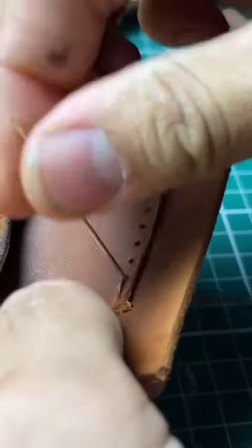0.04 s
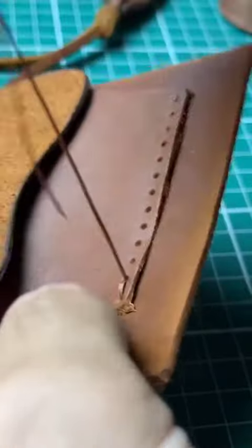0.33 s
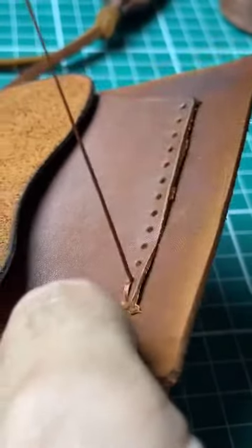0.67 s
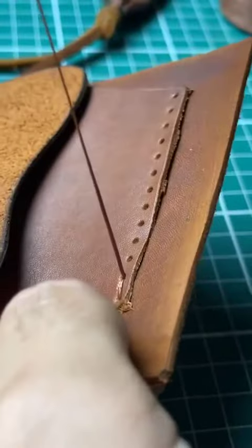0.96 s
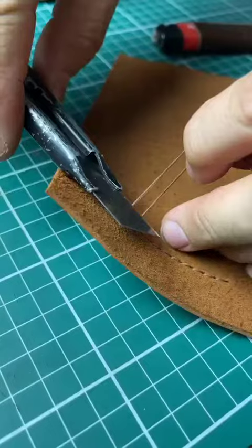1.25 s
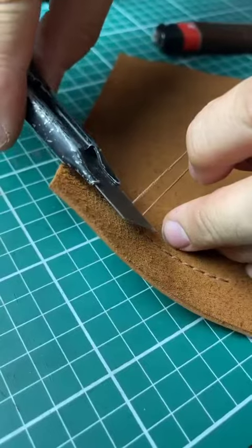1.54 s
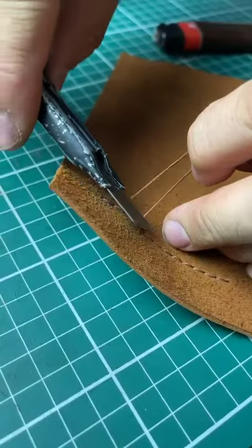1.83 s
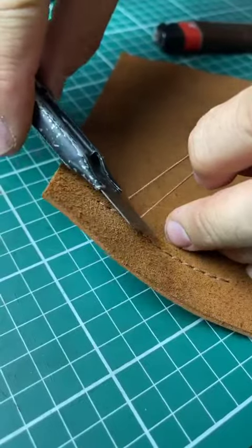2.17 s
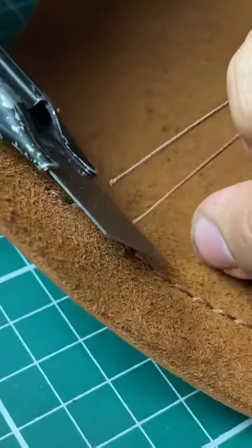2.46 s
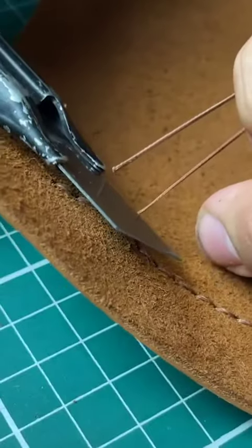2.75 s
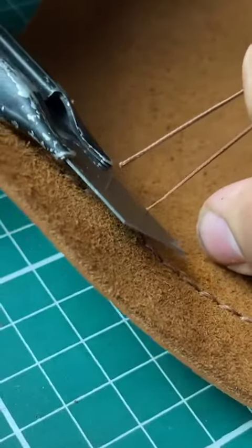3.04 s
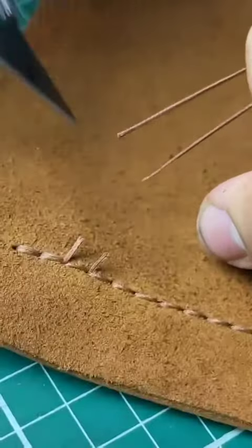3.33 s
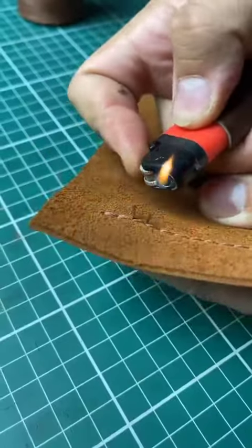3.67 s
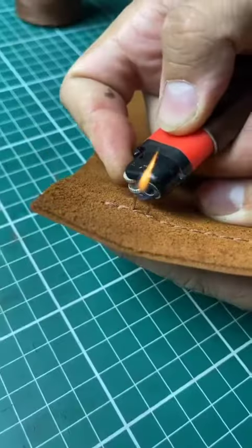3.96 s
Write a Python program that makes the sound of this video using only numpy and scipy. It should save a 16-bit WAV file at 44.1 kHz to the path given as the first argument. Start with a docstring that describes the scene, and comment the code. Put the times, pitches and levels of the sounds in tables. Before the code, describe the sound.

A blade scrapes and ticks through thread on leather, close to the microphone in a quiet room. Thread is first tugged through a hole; short cutting strokes follow and end in a sharp snap, then a lighter rasps and catches.

```python
"""Leatherwork close to the microphone in a quiet room, with soft bumps of hands on leather.
First a thread is tugged free and hisses through a stitch hole. Next a blade saws at the thread ends
in short strokes: fibres tick and sizzle, the blade clinks in its holder, and the thread snaps.
Last, a lighter's flint wheel rasps and the gas catches with a soft pop."""
import sys
import numpy as np
from scipy import signal
from scipy.fft import rfft, irfft, next_fast_len
from scipy.io import wavfile
from scipy.ndimage import map_coordinates

SR = 44100
rng = np.random.default_rng(int(sys.argv[2]) if len(sys.argv) > 2 else 0)


def log_audio(samples):
    """Write samples as a 16-bit WAV file to the path given in sys.argv[1]."""
    # one column per channel
    frames = np.atleast_2d(samples).T
    # limit to full scale, then quantise
    limited = np.clip(frames, -1, 1)
    pcm = np.round(limited * 32767).astype(np.int16)
    wavfile.write(sys.argv[1], SR, pcm)


N = 176400  # 4 seconds

# A "colour" says how strong each frequency is. A "tilt" brightens it, in dB per octave.
# A "t60" is the time in seconds that a sound takes to fade by 60 dB.
# The colour of a tiny tick of fibre or steel. Each row: frequency in Hz, level in dB.
TICK_COLOUR = [(200,-12),(1300,-15),(2600,-4),(4400,-4.5),(5500,-0.5),(6400,-7.5),(8500,-4.5),(11000,-18.5),(15000,-33.5)]


def leather_rubs():
    """The thread rasps brightly as the pull begins; later, blade and fingers rub the leather."""
    # Each row: start in seconds, length in seconds, level in dB, tilt in dB per octave.
    rubs = [(0.418,0.033,-59.5,7),(1.41,0.097,-73,0),(1.628,0.06,-63,-2),(1.753,0.019,-59.5,-5),(1.839,0.057,-59,-1),(1.928,0.02,-52.5,-1.5),(1.951,0.04,-65,0.5),
            (2.029,0.082,-62,1.7),(2.141,0.091,-64.5,-1),(2.26,0.067,-64.5,0.5),(2.354,0.049,-69.5,-2),(2.447,0.079,-66.5,0),(2.566,0.048,-64,-4.5),
            (2.753,0.068,-65,-2.5),(2.866,0.049,-63.5,1.5),(3.033,0.073,-66,-2.5),(3.164,0.044,-54.5,-3.5),(3.257,0.058,-68,2)]
    # The colour of scraped leather. Each row: frequency in Hz, level in dB.
    scrape_colour = [(150,-10),(550,-6),(900,1.5),(1700,-0.5),(2200,-2),(2950,0),(4000,-4),(7500,-10),(9800,-5),(15000,-19.5)]
    out = np.zeros((2, N))
    for start, length, db, tilt_db in rubs:
        at, press = swell(start, length, rise_s=0.0045, fall_s=0.0086)
        rub = friction(len(press), scrape_colour, tilt_db, grain_db=2, grain_hz=498)
        rub = unit(filtered(rub, lambda hz: amp(contact_ripple(hz))))
        add(out, at, amp(db) * press * rub)
    return out


def fraying_fibres():
    """Fibres sizzle where the edge bites: narrow noise whose pitch wanders as they stretch and part."""
    # Each row: start in seconds, length in seconds, level in dB.
    frays = [(1.337,0.027,-74.5),(1.534,0.048,-72),(1.657,0.029,-65.5),(1.7,0.03,-69),(1.89,0.015,-58),(2.669,0.034,-62),(2.873,0.034,-60),(3.054,0.042,-59.5),(3.215,0.031,-65)]
    centre_hz, width_hz, wander_hz = 8150, 1050, 608
    lowpass = lambda hz: 1 / np.hypot(1, hz / width_hz) / np.hypot(1, 2 * hz / centre_hz)
    out = np.zeros((2, N))
    for start, length, db in frays:
        at, bite = swell(start, length, rise_s=0.0016, fall_s=0.0032)
        n = len(bite)
        pitch_hz = centre_hz + wander_hz * wander(n, rate_hz=160)
        phase = 2 * np.pi * np.cumsum(pitch_hz) / SR
        low_noise = filtered(rng.standard_normal((2, 2, N))[..., :n], lowpass)
        sizzle = low_noise[0] * np.cos(phase) + low_noise[1] * np.sin(phase)  # moved up to the pitch
        add(out, at, amp(db) * bite * unit(spread(sizzle)))
    return out


def fibre_ticks():
    """Single fibres tick as they part."""
    # Each row: start in seconds, level in dB, tilt in dB per octave.
    ticks = [(1.3728,-40.5,-3.5),(1.411,-39,-4),(1.4626,-41,-1.5),(1.476,-37.5,-5.5),(1.5025,-39.5,-6.5),(1.5427,-44,1),(1.6572,-40,3),
             (1.6785,-35,4),(1.7068,-33,0),(1.8409,-29,5),(1.9007,-30,-2),(2.2938,-32.5,-4.5),(2.5065,-33,-1.5),(2.6672,-29,1.5),(2.6865,-31,0),
             (2.8734,-23,4.5),(2.881,-34,1),(2.8903,-27,3.5),(2.9054,-26.5,2.5),(3.057,-19.5,6),(3.067,-32,3),(3.0742,-27.5,2.5),(3.082,-33,1),
             (3.091,-28.5,-1),(3.1141,-32.5,-1),(3.213,-26.5,-0.5),(3.2536,-31,2),(3.2854,-32,1),(3.3985,-41.5,-5.5)]
    out = np.zeros((2, N))
    for start, db, tilt_db in ticks:
        add(out, start, amp(db) * crack(TICK_COLOUR, tilt_db, t60=0.0097, crumble=6.4))
    return out


def snaps():
    """Thread, flint and igniting gas let go with sharp snaps."""
    # Each row: start in seconds, level in dB, tilt in dB per octave, t60 in seconds.
    releases = [(0.36,-39.5,-1,0.034),(0.3931,-23.5,2.5,0.026),(.397,-17.5,-5.5,0.02),(1.8927,-19,2.5,0.015),(1.943,-22.5,1.8,.018),
                (3.195,-17,1.5,0.008),(3.1972,-5,-1,0.0074),(3.641,-9.5,-4.5,.012),(3.644,-9,0,.014),(3.648,-12.5,7,0.013),(3.699,-21,-4.5,.02),(3.706,-20.5,-1,.015),(3.722,-17.5,-9,.012)]
    # The colour of a snap. Each row: frequency in Hz, level in dB.
    snap_colour = [(100,-3.5),(230,-1.5),(420,-11),(780,2.5),(1250,-1),(1600,0),(2050,-7.5),(2900,-6.5),(4300,-14),(8500,-15.5),(15000,-27.5)]
    out = np.zeros((2, N))
    for start, db, tilt_db, t60 in releases:
        add(out, start, amp(db) * crack(snap_colour, tilt_db, t60, crumble=1.07))
    return out


def blade_clink():
    """The steel blade shifts in its holder, rings briefly and chatters once."""
    # The blade's ringing tones. Each row: frequency in Hz, level in dB, t60 in seconds.
    tones = [(2833,1,0.023),(4820,-5.5,0.022),(5330,-8,0.025),(8700,-21,0.022)]
    clink_s, clink_db, chatter_delay_s, chatter_drop_db = 1.9813, -33.5, 0.0071, 16
    out, t = np.zeros((2, N)), np.arange(SR // 8) / SR
    attack = 1 - np.exp(-t / 0.00018)
    for start, db in [(clink_s, clink_db), (clink_s + chatter_delay_s, clink_db - chatter_drop_db)]:
        ring = sum(amp(tone_db) * fade(t, t60) * np.sin(2 * np.pi * (hz * t + rng.random()))
                   for hz, tone_db, t60 in tones)
        add(out, start, amp(db) * ring * attack)
        add(out, start, amp(db + 3) * crack(TICK_COLOUR, tilt_db=2, t60=0.026, crumble=3.2))
    return out


def thread_pull():
    """Thread hisses through the stitch hole, fading as the arm extends and slows."""
    # The loudness of the pull. Each row: time in seconds, level in dB.
    pull = [(.38,-100),(.393,-50),(.415,-57.5),(.44,-54),(.51,-66.5),(.72,-68),(.82,-72.5),(1.02,-98)]
    # The colour of the hiss. Each row: frequency in Hz, level in dB.
    pull_colour = [(150,-25),(250,-4.5),(500,-22),(750,-11.5),(950,-16),(1350,-8),(2350,-13),(2650,-10),(2900,-17),(7000,-24),(11900,-27),(15000,-39)]
    return level(pull) * friction(N, pull_colour, tilt_db=-0.5, grain_db=0.5, grain_hz=697)


def lighter():
    """The wheel rolls and rings, then grinds the flint; sparks sputter and the gas hisses on."""
    # The loudness of the lighter. Each row: time in seconds, level in dB.
    flick = [(3.49,-100),(3.52,-71.5),(3.58,-68.5),(3.588,-59.5),(3.625,-47.5),(3.644,-29.5),(3.655,-35),(3.676,-37.5),(3.682,-48),(3.705,-47),(3.74,-67.5),(3.83,-75.5),(4,-86.5)]
    # The rolling wheel's ringing bands. Each row: centre in Hz, width in Hz, level in dB.
    wheel_bands = [(1800,400,-9),(3000,590,4.5),(8260,1500,0.5)]
    # The colour of sparks and gas. Each row: frequency in Hz, level in dB.
    spark_colour = [(150,-8),(1400,-5),(2000,-10.5),(2700,-5.5),(4800,-5),(5750,-10),(6400,-5.5),(9500,-5),(14300,-16.5),(15700,-45)]
    ring = lambda hz: sum(amp(db) / np.hypot(1, 2 * (hz - centre) / width)
                          for centre, width, db in wheel_bands)
    roll = unit(spread(filtered(rng.standard_normal((2, N)), ring)))
    sparks = friction(N, spark_colour, tilt_db=0, grain_db=2.5, grain_hz=1501)
    bite_s = 3.63  # the wheel starts to throw sparks
    bite = soft_step(np.arange(N) / SR - bite_s, ease_s=0.0045)
    return level(flick) * (np.sqrt(1 - bite) * roll + np.sqrt(bite) * sparks)


def thuds():
    """Hands, leather and igniting gas make soft, low bumps that sag in pitch as the pressure eases."""
    # Each row: start in seconds, level in dB, starting pitch in Hz, t60 in seconds.
    bumps = [(0.177,-42.5,188,0.027),(.181,-47,61.4,0.38),(0.335,-46,54.6,0.3),(.394,-21,191,0.017),(0.409,-35,52.4,0.27),(.853,-51,75,0.13),
             (1.143,-51.5,102,0.06),(1.892,-40.5,118,0.036),(2.268,-43.5,130,0.03),(2.268,-51,430,0.052),(2.723,-50,267,0.098),
             (3.198,-23,100,0.044),(3.229,-44,59.4,0.28),(3.642,-20.5,103.5,0.029),(3.715,-30.5,130,0.021),(3.722,-22.5,111,0.018)]
    sag_fraction, sag_s, attack_s = 0.264, 0.021, 0.001
    out, t = np.zeros((2, N)), np.arange(SR // 3) / SR
    attack = 1 - np.exp(-t / attack_s)
    sag = 1 - sag_fraction * (1 - np.exp(-t / sag_s))
    for start, db, hz, t60 in bumps:
        phase = 2 * np.pi * np.cumsum(hz * sag) / SR
        swing = -np.sin(phase) * fade(t, t60) * attack
        pan_db = 5.4 * np.tanh(2 * np.log2(hz / 58))  # bumps above 58 Hz lean left
        add(out, start, amp([[db + pan_db / 2], [db - pan_db / 2]]) * swing)
    return out


def room_echo(x):
    """The walls add a short tail to every sound."""
    t = np.arange(SR // 2) / SR
    tail = spread(rng.standard_normal((2, len(t))) * fade(t, t60=0.34))
    return signal.fftconvolve(x, tail / np.linalg.norm(tail[0]), axes=1)[:, :N]


def background():
    """The room's steady hush and the low rustle of hands on leather."""
    # The colours of the hush and the rustle. Each row: frequency in Hz, level in dB.
    hush_colour = [(25,-20.5),(90,-16.5),(190,-32),(430,-33),(6400,-44.5),(12000,-46.5),(15500,-61)]
    rustle_colour = [(25,-12),(85,0),(160,-6.5),(350,-15.5),(3000,-41)]
    # The loudness of the rustle. Each row: time in seconds, level in dB.
    handling = [(0,-70),(.8,-70.5),(1.05,-75),(1.9,-60.5),(2.5,-70.5),(4,-67.5)]
    hush = amp(-74) * friction(N, hush_colour, tilt_db=0, grain_db=0, grain_hz=1)
    rustle = level(handling) * friction(N, rustle_colour, tilt_db=0, grain_db=2, grain_hz=34.7)
    return hush + rustle


def friction(n, colour, tilt_db, grain_db, grain_hz):
    """Stereo rubbing noise whose strength shifts by about grain_db, with grain_hz tiny slips a second."""
    slips = amp(grain_db * wander(n, grain_hz))
    noise = rng.standard_normal((2, N))[:, :n] * slips
    return unit(spread(filtered(noise, lambda hz: amp(tilted(colour, hz, tilt_db)))))


def crack(colour, tilt_db, t60, crumble):
    """A sharp click and a noisy tail, crumble times as strong; the total energy is 1 per channel."""
    n = 4096
    tail = rng.standard_normal((2, n)) * fade(np.arange(n) / SR, t60)
    push = crumble * tail / np.linalg.norm(tail[0])
    push[0, 0] += 1  # the click itself
    hz = np.fft.rfftfreq(n, 1 / SR)
    gain = amp(tilted(colour, hz, tilt_db) + contact_ripple(hz) / 2)
    # Build a filter that rings only after the click, never before it (minimum phase).
    cepstrum = irfft(np.log(gain))
    cepstrum[1:n // 2] *= 2
    cepstrum[n // 2 + 1:] = 0
    response = np.exp(rfft(cepstrum))
    x = spread(irfft(rfft(push) * response))
    return x / np.sqrt(np.sum(x ** 2) / 2)


def contact_ripple(hz):
    """Random peaks and dips in dB that give each contact its own tone."""
    depth_db, spacing_hz = 2, 455
    return depth_db * map_coordinates(rng.standard_normal(4096), [hz / spacing_hz], mode="mirror")


def swell(start, length, rise_s, fall_s):
    """A stroke grips, holds and lets go: returns when to mix it in, and its loudness curve."""
    lead_s = 0.03
    t = np.arange(round((length + 3 * lead_s) * SR)) / SR - lead_s
    return start - lead_s, soft_step(t, rise_s) * soft_step(length - t, fall_s)


def spread(pair):
    """Two unrelated signals become left and right: bass alike, treble wide."""
    # Each row: frequency in Hz, how alike left and right are from 0 to 1.
    likeness = [(60,0.89),(1200,0.85),(2800,0.96),(5000,0.41),(15000,0.24)]
    angle = lambda hz: np.arccos(np.clip(along(likeness, hz), 0, 1)) / 2
    mid, side = filtered(pair, lambda hz: np.array([np.cos(angle(hz)), np.sin(angle(hz))]))
    return np.array([mid + side, mid - side])


def soft_step(t, ease_s):
    """A smooth climb from 0 to 1 around t = 0."""
    return (1 + np.tanh(t / ease_s / 2)) / 2


def fade(t, t60):
    """A gain that falls by 60 dB every t60 seconds."""
    return amp(-60 * t / t60)


def wander(n, rate_hz):
    """A line that drifts to a new random value rate_hz times a second."""
    return np.interp(np.arange(n) * rate_hz / SR, np.arange(N), rng.standard_normal(N))


def amp(db):
    """Turn decibels into gain."""
    return 10 ** (np.asarray(db) / 20)


def unit(x):
    """Scale to an average power of 1."""
    return x / np.sqrt(np.mean(x ** 2) + 1e-20)


def level(rows):
    """A gain for every sample, from rows of seconds and dB."""
    return amp(np.interp(np.arange(N) / SR, *np.transpose(rows)))


def along(rows, hz):
    """Read between rows of Hz and value, with octaves evenly spaced."""
    row_hz, values = np.transpose(rows)
    return np.interp(np.log(hz + 1), np.log(row_hz + 1), values)


def tilted(colour, hz, tilt_db):
    """A colour in dB, tipped around 3000 Hz by tilt_db per octave from 800 Hz up."""
    return along(colour, hz) + tilt_db * np.log2(np.maximum(hz, 800) / 3000)


def filtered(x, response):
    """Scale each frequency in x by response(hz)."""
    n = x.shape[-1]
    padded = next_fast_len(n + 4096)
    return irfft(rfft(x, padded) * response(np.fft.rfftfreq(padded, 1 / SR)), padded)[..., :n]


def add(out, start, x):
    """Mix x into out at start seconds."""
    i = max(round(start * SR), 0)
    out[:, i:i + x.shape[-1]] += x[..., :max(N - i, 0)]


def scene():
    """All the work at the bench, in its room."""
    work = (thread_pull() + leather_rubs() + fraying_fibres() + fibre_ticks() + snaps()
            + thuds() + blade_clink() + lighter())
    return work + amp(-18) * room_echo(work) + background()


def record(dry):
    """Keep only the sound below 15900 Hz."""
    return filtered(dry, lambda hz: hz < 15900)


dry = scene()
out = record(dry)
log_audio(out)
```